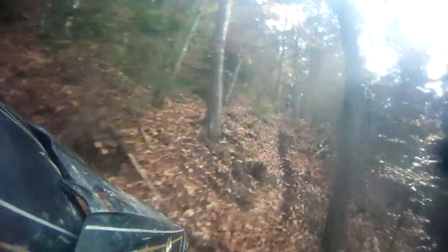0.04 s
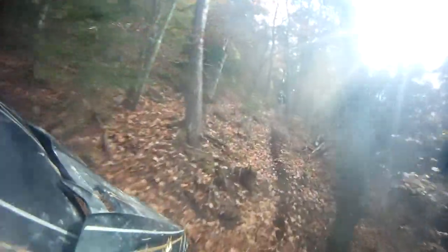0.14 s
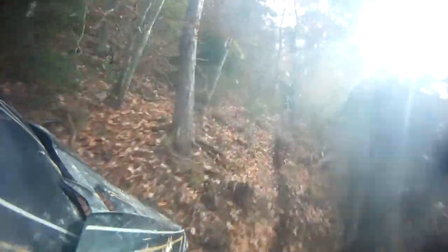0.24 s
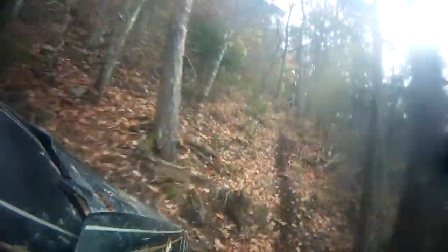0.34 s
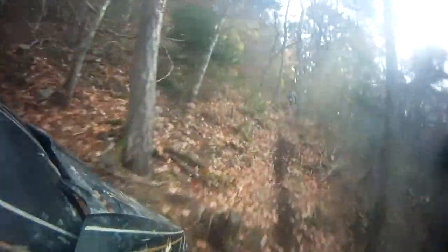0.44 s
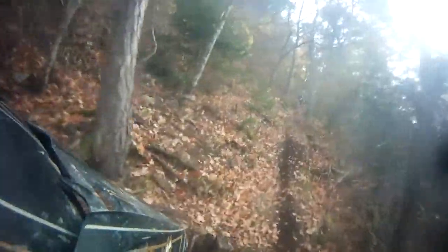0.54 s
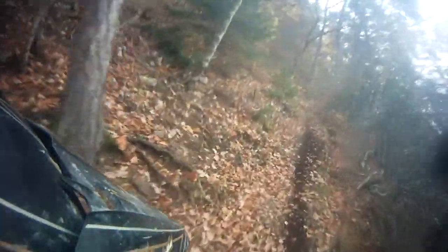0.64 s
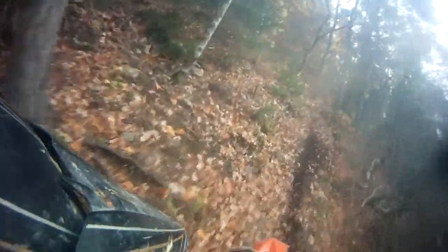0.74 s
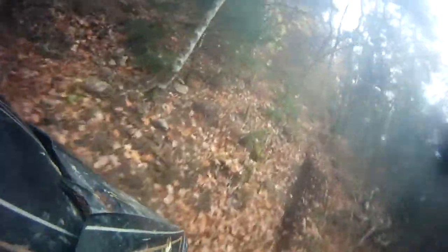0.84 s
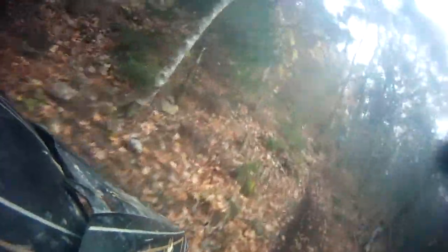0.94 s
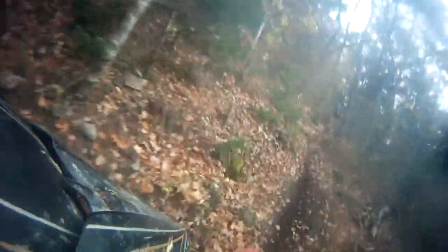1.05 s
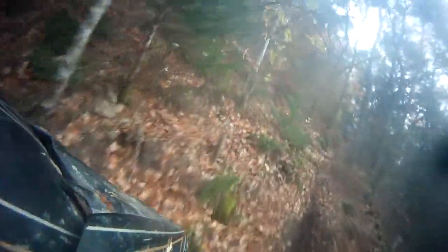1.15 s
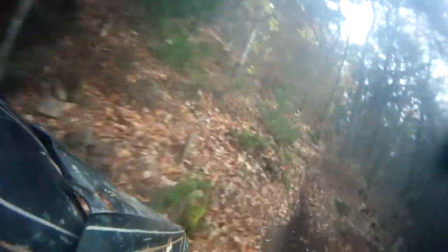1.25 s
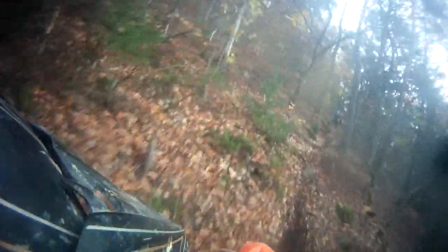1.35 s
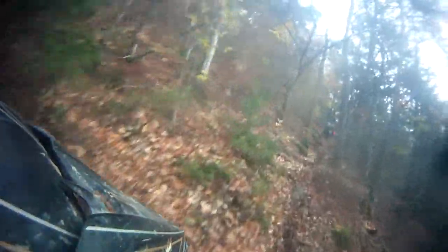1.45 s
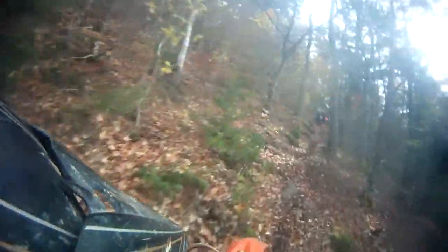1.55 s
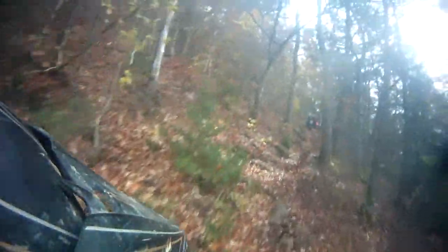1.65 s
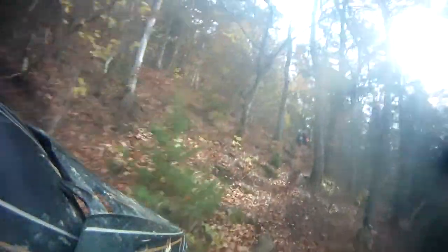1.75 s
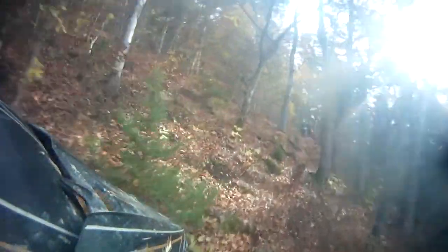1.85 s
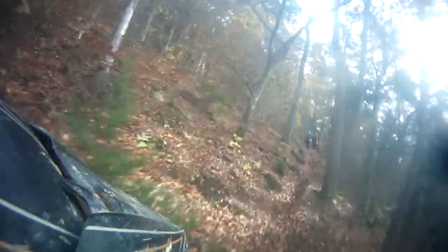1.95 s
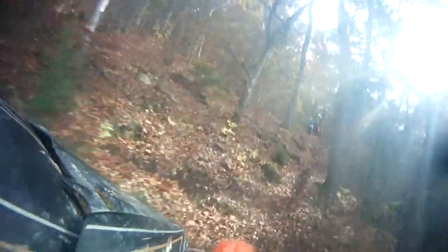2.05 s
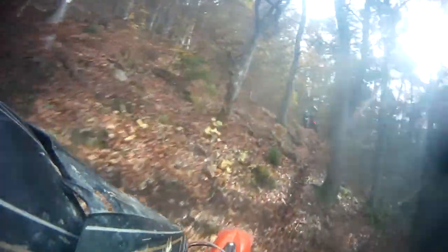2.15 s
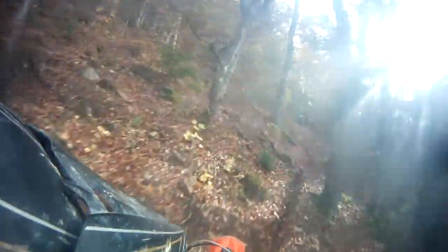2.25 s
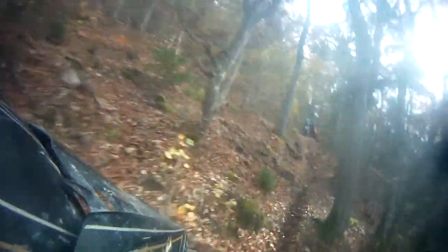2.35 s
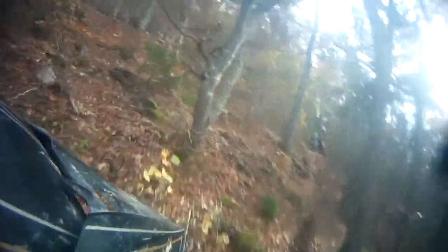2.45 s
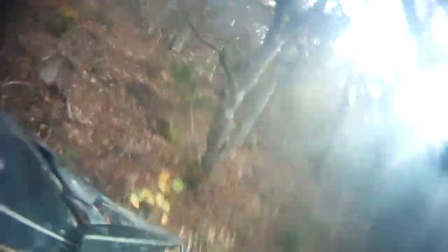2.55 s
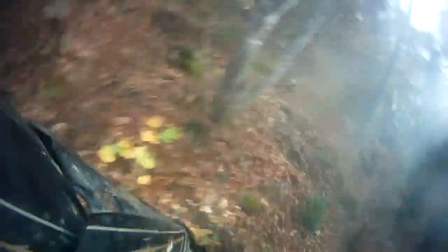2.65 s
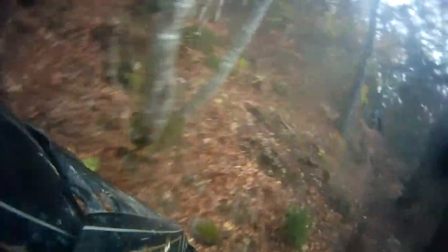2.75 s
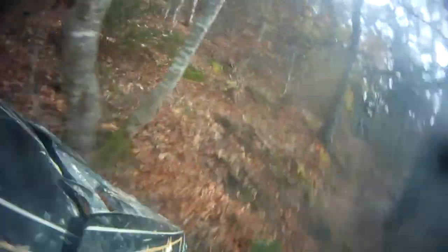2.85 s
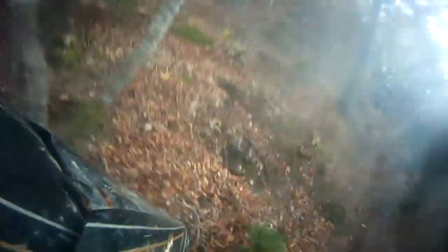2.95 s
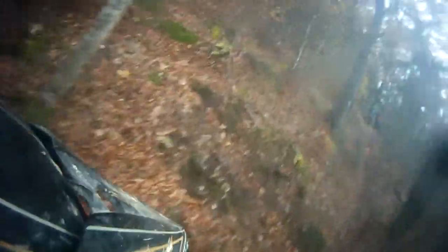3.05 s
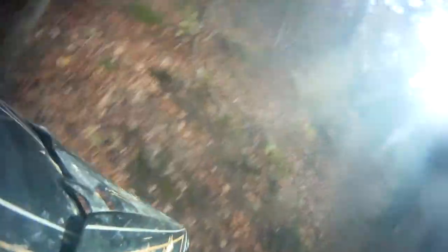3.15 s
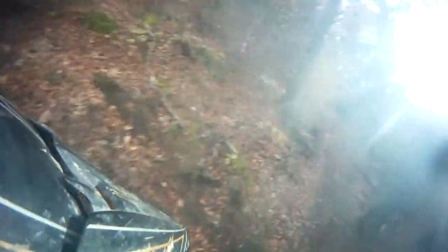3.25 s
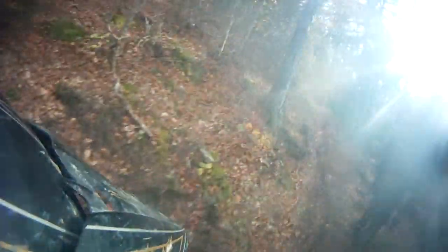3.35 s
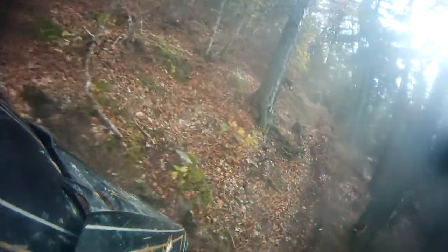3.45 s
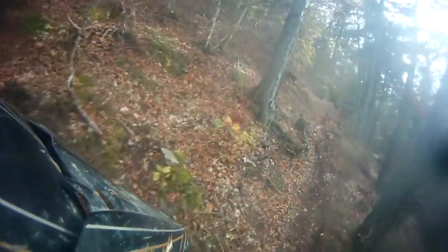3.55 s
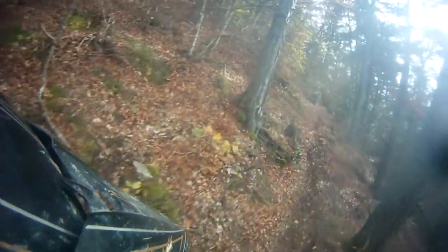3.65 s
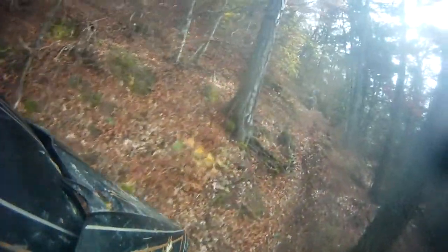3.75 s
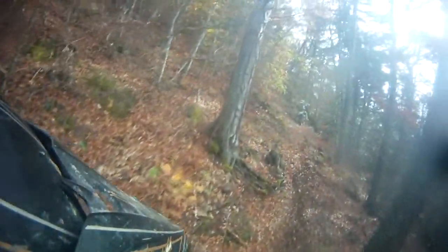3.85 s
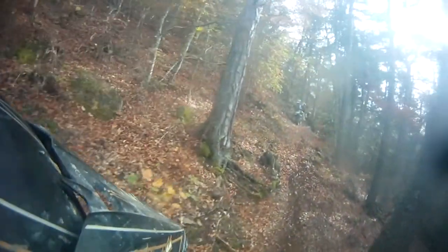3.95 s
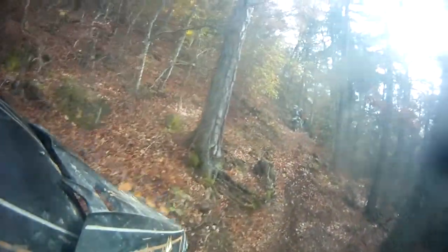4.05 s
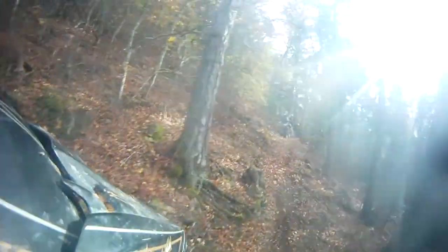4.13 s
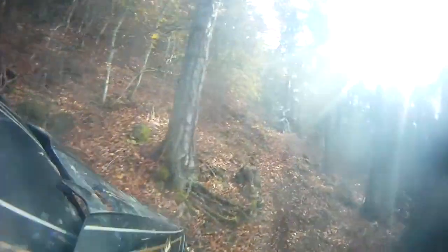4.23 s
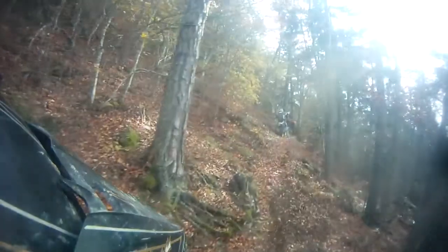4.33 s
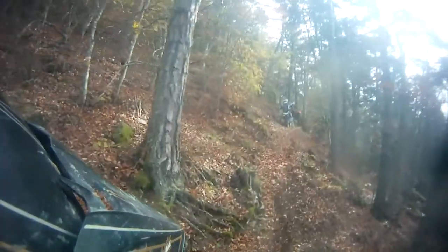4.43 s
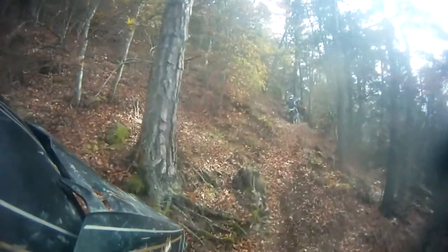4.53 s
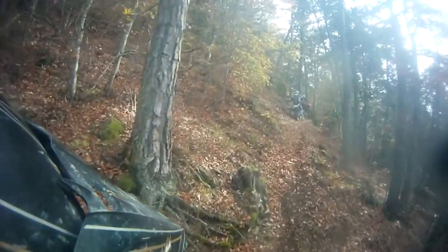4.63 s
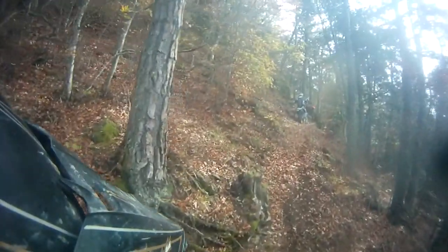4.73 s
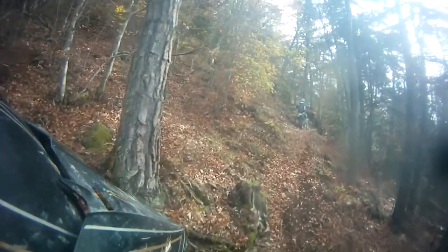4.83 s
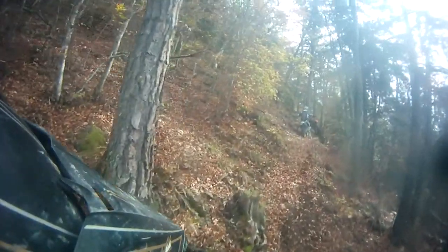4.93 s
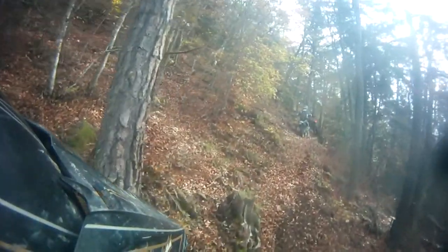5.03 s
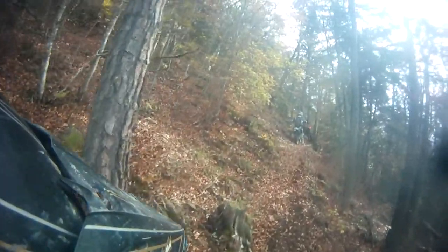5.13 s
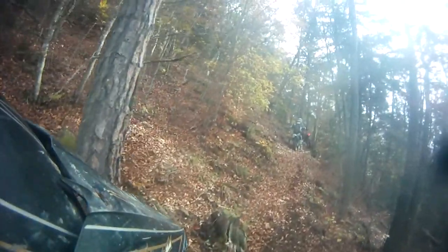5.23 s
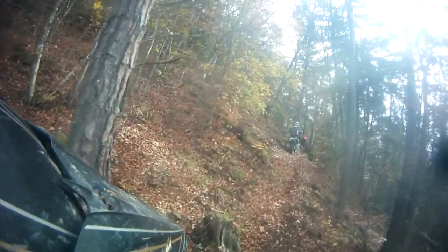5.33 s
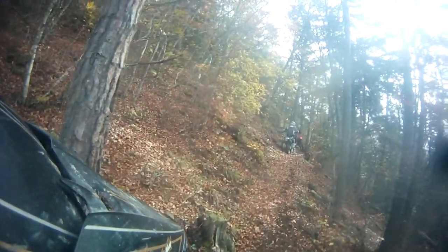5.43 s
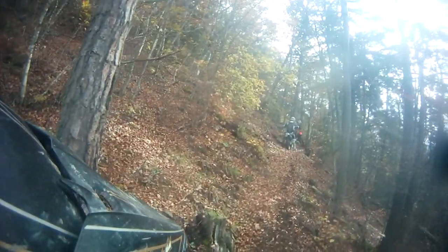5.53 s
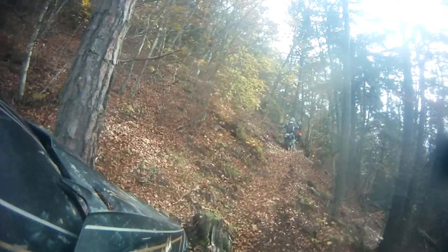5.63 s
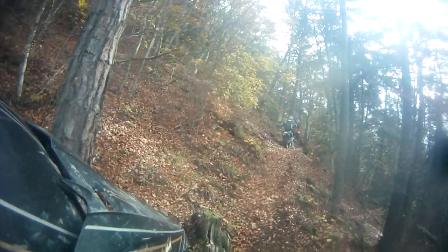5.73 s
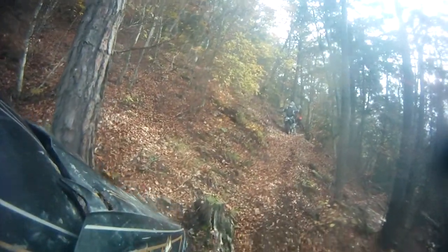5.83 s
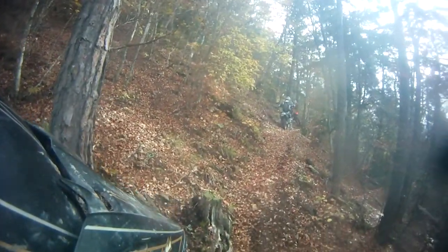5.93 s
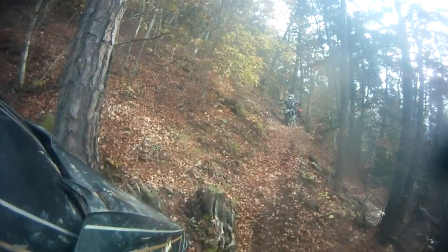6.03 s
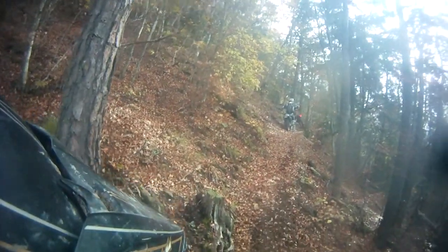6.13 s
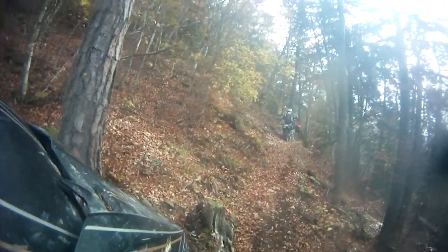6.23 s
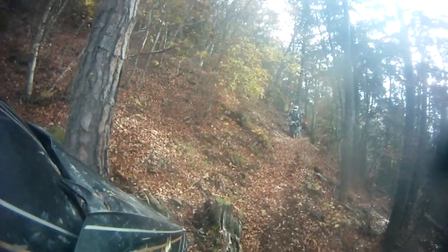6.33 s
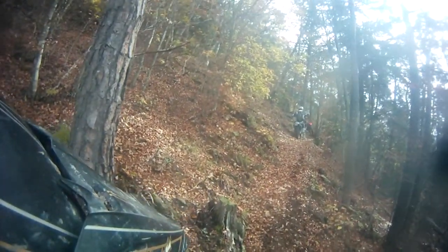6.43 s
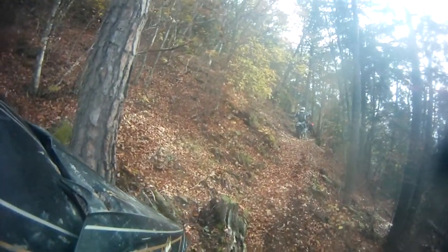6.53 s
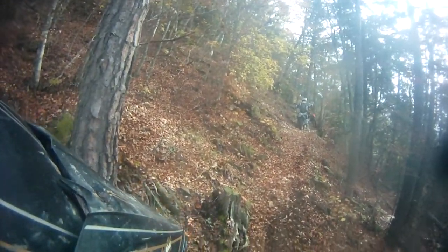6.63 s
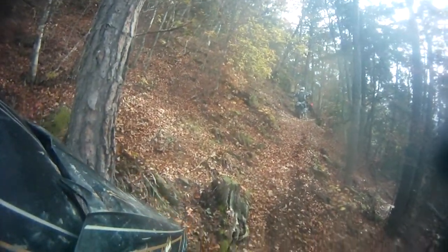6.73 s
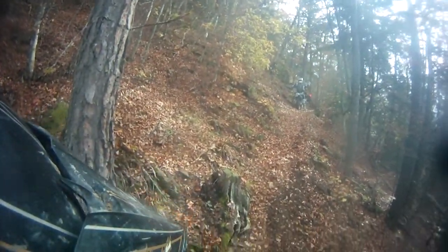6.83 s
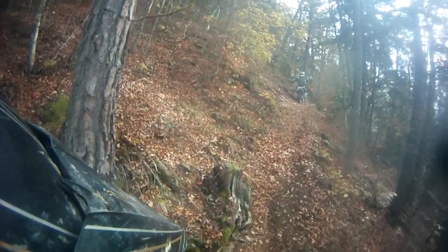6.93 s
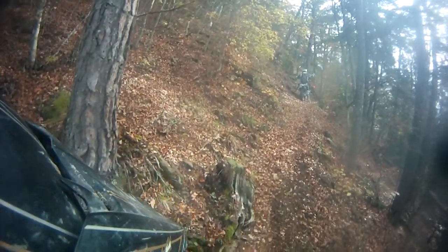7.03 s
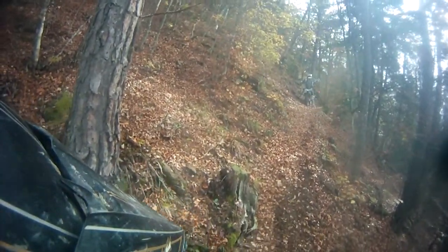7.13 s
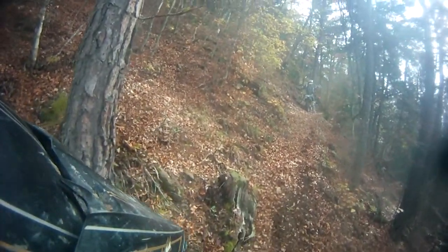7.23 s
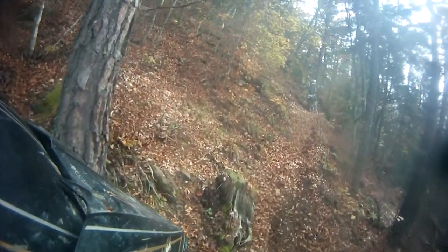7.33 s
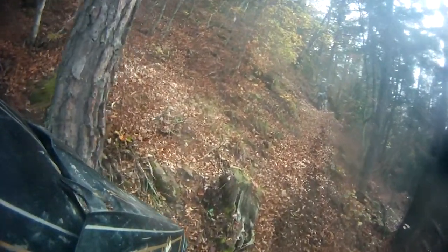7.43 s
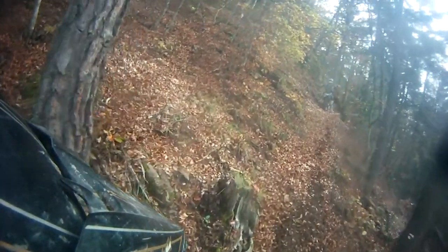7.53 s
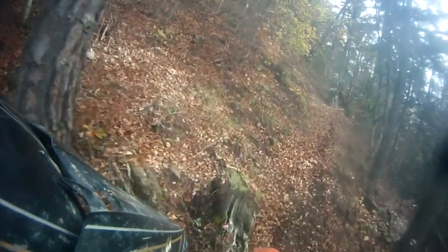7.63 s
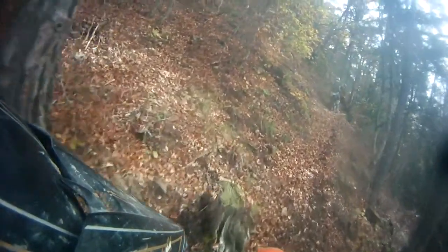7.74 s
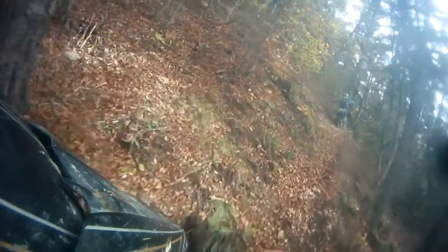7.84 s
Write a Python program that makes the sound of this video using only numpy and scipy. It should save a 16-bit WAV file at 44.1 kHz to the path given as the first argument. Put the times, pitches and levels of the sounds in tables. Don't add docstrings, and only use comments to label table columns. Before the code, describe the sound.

Close, boxy, nearly mono sound of an off-road motorcycle on a leafy trail: low thumping exhaust, dry metallic chatter and faint wind. A hard throttle blip leads into a long pull; then branches snap and knock on the camera housing with low thuds and leafy hiss. Short revs follow, then a slow idle of individual beats before a final rough acceleration.

```python
import sys
import numpy as np
from scipy import signal
from scipy.fft import rfft, irfft, next_fast_len
from scipy.io import wavfile
from scipy.ndimage import uniform_filter1d, map_coordinates

SR = 44100
rng = np.random.default_rng(int(sys.argv[2]) if len(sys.argv) > 2 else 0)


def generate_wav(sig):
    pcm = np.round(np.clip(np.atleast_2d(sig).T, -1, 1) * 32767).astype(np.int16)
    wavfile.write(sys.argv[1], SR, pcm)


def how_loud(loudness_db):
    steps = np.asarray(loudness_db, float) / 20
    return 10 ** steps


N = 347508
TIME = np.arange(N) / SR
CRUISE_HZ = 25
LEAD_S = .015
OPEN_S = 0.092


def noise(n=N):
    return rng.standard_normal(n)


def unit(x):
    return x / np.sqrt(np.mean(x ** 2) + 1e-20)


def summed(*levels_db):
    return 10 * np.log10(sum(how_loud(db) ** 2 for db in levels_db))


def along(points, hz):
    f, v = np.transpose(points)
    return np.interp(np.log(hz + 1), np.log(f + 1), v)


def filtered(x, response):
    m = next_fast_len(len(x) + SR // 8)
    return irfft(rfft(x, m) * response(np.fft.rfftfreq(m, 1 / SR)), m)[:len(x)]


def modes(table, f):
    return sum((-1) ** k * how_loud(db) * 1j * f * width / (hz * hz - f * f + 1j * f * width)
               for k, (hz, width, db) in enumerate(table))


def wobble(rate_hz):
    return map_coordinates(noise(int(N * rate_hz / SR) + 4), [TIME * rate_hz])


def train(times, sizes):
    at = np.round(times * SR).astype(int)
    inside = (at >= 0) & (at < N)
    return np.bincount(at[inside], sizes[inside], N)


def burst(rise_s, fall_s):
    return lambda f: SR * (rise_s / (1 - 2j * np.pi * f * rise_s) + fall_s / (1 + 2j * np.pi * f * fall_s))


def swells(table):
    return sum(how_loud(db) * np.exp(np.where(TIME < s, (TIME - s) / rise, (s - TIME) / fall))
               for s, db, rise, fall in table)


# time in seconds, firings per second.
SPEED = [(-.12, 27.52), (.29, 26.8), (.43, 19.5), (.58, 29.55), (1.28, 27.53), (1.8, 28.58), (1.93, 30.68),
         (2.25, 29.37), (2.39, 33.3), (2.82, 23.0), (3.71, 17.54), (3.84, 21.63), (4.59, 15.74),
         (5.13, 31.02), (6.03, 16.14), (6.73, 15.52), (7.12, 23.8), (7.93, 25.38)]


def fast(t):
    return np.interp(t, *np.transpose(SPEED)) - CRUISE_HZ


# time in seconds, firings lost.
STUMBLES = [
    (3.68, .312),
    (6.81, .35),
]
# time in seconds, lateness as a share of a cycle.
LATE = [(0, .05), (.6, .08), (.87, .2), (1.01, -.1), (1.15, .04), (1.5, -.07), (1.75, -.03), (1.93, .05),
        (2.06, .04), (2.2, .1), (2.36, .3), (2.5, 0), (3.4, -.04), (3.8, .03), (4.15, -.15), (4.33, .05),
        (4.6, -.05), (4.8, .07), (5.03, .08), (5.13, .06), (5.3, -.09), (5.42, -.13), (5.6, -.03),
        (5.8, .04), (6.2, 0), (6.55, .03), (6.85, 0), (7.0, .07), (7.35, .13), (7.5, .1), (7.63, 0),
        (7.8, .1)]


def firings():
    s = np.arange(SPEED[0][0], SPEED[-1][0], 1 / 1000)
    count = -3.457 + np.cumsum(np.interp(s, *np.transpose(SPEED))) / 1000
    count = count - sum(lost * (s > at) for at, lost in STUMBLES)
    count = count - np.interp(s, *np.transpose(LATE))
    return np.interp(np.arange(np.ceil(count[0]), count[-1]), np.maximum.accumulate(count), s)


# open in seconds, shut in seconds, exhaust bark in dB on opening,
# bark in dB before shutting, combustion knock in dB.
THROTTLE = [
    (-.1, 0.292, -59, -58.5, -11),
    (0.504, .8, -42, -59, -5),
    (0.792, 1.04, -53.5, -51, -14),
    (1.044, 2.386, -46, -48, 7.5),
    (3.332, 3.47, -48.5, -59.5, 6),
    (3.685, 4.295, -48, -56, 11),
    (4.28, 4.684, -70, -63, -16),
    (4.68, 4.97, -50.5, -58, 2),
    (6.845, 7.95, -49, -49, 7.5),
]


def throttle(t):
    shut_s = 0.059
    bark = how_loud(-64 + 0.48 * fast(t))
    knock_db = -10 + .3 * fast(t)
    for start, end, first_db, last_db, load_db in THROTTLE:
        share = np.clip((t - start) / OPEN_S, 0, 1) * np.exp(-np.maximum(t - end, 0) / shut_s)
        bark = bark + share * how_loud(np.interp(t, [start, end], [first_db, last_db]))
        knock_db = knock_db + share * (load_db - knock_db)
    return 20 * np.log10(bark), knock_db


def driven_db(t, bark_db, cruise_db, db_per_hz, least_db, load_db):
    return summed(cruise_db + db_per_hz * fast(t - 0.036), least_db, bark_db + load_db)


def shut_share(bark_db):
    return np.clip((-51.5 - bark_db) / 7.5, 0, 1)


def pulse_size(fire, luck):
    return np.sqrt(np.gradient(fire) * SR) * how_loud(.8 * luck[:, 0])


# time in seconds, frequency in Hz.
PIPE_HZ = [(0, 274), (.45, 275), (.55, 262), (.66, 289), (1.0, 284), (1.1, 260), (1.25, 264), (2.35, 280.3),
           (3.4, 261), (3.75, 260), (4.3, 261.6), (4.75, 260), (5.1, 274), (6.0, 247), (6.85, 245),
           (7.1, 260.5), (7.9, 278.4)]
# multiple of the first mode, level in dB, peak after the valve opens in seconds,
# half length in seconds, change in dB with the throttle shut.
PIPE = [(.47, -10.5, 0.005, 0.0075, 13.5), (0.635, -7.5, 0.0037, 0.0061, 3.5),
        (0.99, 3, 0.0095, 0.0082, -1.5), (1.141, -2, 0.0054, 0.0068, 5.5), (1.59, 0, 0.0051, 0.0054, 0.5),
        (1.86, -5.5, 0.0074, 0.0094, 0), (3.3, -3, 0.0068, 0.0064, -1), (4.01, -10, 0.008, 0.01, 8)]


def exhaust_bark(fire, bark_db, luck):
    t = np.arange(SR // 12) / SR
    shut = shut_share(bark_db)[:, None]
    pitch = np.interp(fire, *np.transpose(PIPE_HZ))[:, None]
    pitch = pitch * (1 + 0.75 * (0.14 + shut) * (t - LEAD_S))
    pitch = pitch * (1 + .006 * luck[:, 1:2])

    def hump(at, half):
        return np.exp(-((t - LEAD_S - at) / half) ** 2)

    rows = 0
    for multiple, db, at, half, shut_db in PIPE:
        scatter_db = .7 * luck[:, [int(multiple * 7) % 12]]
        tone = np.sin(2 * np.pi * multiple * pitch * (t - LEAD_S))
        rows = rows + how_loud(db + shut * shut_db + scatter_db) * hump(at, half) * tone
    cycle = np.gradient(fire)[:, None]
    puff_db = np.minimum(-5 + 0.74 * (1 / cycle - CRUISE_HZ), -3)
    rows = rows + how_loud(puff_db) * hump(0.78 * cycle, 0.0044) * np.sin(2 * np.pi * pitch * t)
    level = pulse_size(fire, luck) * how_loud(bark_db + 4.0)
    rows = -rows * (level / np.linalg.norm(rows, axis=1))[:, None]
    at = np.round((fire[:, None] + t - LEAD_S) * SR + SR).astype(int)
    bark = np.bincount(at.ravel(), rows.ravel(), N + 3 * SR)[SR:SR + N]
    return filtered(bark, lambda f: f ** 4 / (f ** 4 + 70 ** 4))


# frequency in Hz, width in Hz, level in dB.
SILENCER = [(50, 40, -34), (148, 25, 13.5), (191.4, 40, 17)]


def silencer_boom(fire, bark_db, luck):
    boom_db = driven_db(fire, bark_db, -68, 2.2, -65.5, -16)
    box = lambda f: modes(SILENCER, f) / (1 + 1j * f / 260) ** 2
    pulses = train(fire - .003, pulse_size(fire, luck) * how_loud(boom_db - 1.5))
    return filtered(pulses, box) / np.linalg.norm(filtered(np.eye(1, N)[0], box))


# start in seconds, end in seconds, gain in dB.
OVERRUNS = [
    (5.15, 5.44, 11.5),
    (2.4, 3, 12),
    (.66, 1.05, 8),
    (.05, .3, 4),
]
SHAKE_DB = [-24, -19, -16, -5, -14, -16, -18, -14]


def frame_shake(fire, bark_db):
    turns = np.interp(TIME, fire, np.arange(len(fire)))
    free_db = 3 * shut_share(bark_db)
    level_db = -70.5 + 1.0 * (1 / np.gradient(fire) - CRUISE_HZ) + free_db
    level_db = np.interp(TIME, fire, level_db)
    for start, end, db in OVERRUNS:
        level_db = level_db + db * np.clip(np.minimum(TIME - start, end - TIME) / OPEN_S + .5, 0, 1)
    return sum(how_loud(db + level_db) * np.sin(2 * np.pi * k * turns) for k, db in enumerate(SHAKE_DB, 1))


def exhaust_jet(fire, bark_db, luck):
    gate = filtered(train(fire + .002, how_loud(bark_db + 1.5 * luck[:, 2])), burst(.001, .009))
    jet_modes = [(797, 57, 1.0), (1500, 360, -2.5), (11500, 1300, -34)]  # Hz, width Hz, dB
    colour = lambda f: modes(jet_modes, f) * f ** 4 / (f ** 4 + 720 ** 4)
    return how_loud(6.5) * gate * unit(filtered(noise(), colour))


# share of a cycle, level in dB against the knock,
# length in seconds.
VALVES = [
    (-.23, -8, .003),
    (-.5, -22, .001),
    (-.1, -16, .001),
    (.27, -7.5, .004),
]


def metal_drive(fire, knock_db, luck):
    knock_db = np.minimum(knock_db, 15)
    knocks = train(fire + .0026 + .0004 * luck[:, 3], how_loud(knock_db + 4 + .8 * luck[:, 4]))
    swell = filtered(knocks, burst(.0004, .0026))
    swell = swell + filtered(train(fire + .002, how_loud(knock_db - 9)), burst(.005, .007))
    for k, (share, db, length) in enumerate(VALVES):
        seat = fire + (share + 0.09 + 0.017 * luck[:, 5 + k]) * np.gradient(fire)
        seat_db = 10.0 + db + .05 * knock_db + 1.6 * luck[:, -1 - k % 3]
        swell = swell + filtered(train(seat, how_loud(seat_db)), burst(0.0016, length))
    loose = how_loud(1.3 * wobble(350) + .5 * wobble(45))
    drive = (1 + .7 * np.abs(swell)) * loose
    return drive / np.sqrt(np.abs(uniform_filter1d(drive ** 2, size=SR // 8)))


# frequency in Hz, width in Hz, level in dB (not used).
METAL = [(884, 17, -6), (1506, 79, -6), (2747, 216, -2), (3160, 283, -1), (3772, 24, -2), (4085, 86, 0),
         (4960, 223, -4), (6556, 147, -12), (7920, 570, -18), (10070, 125, -30)]
# frequency in Hz, density in dB per Hz.
RATTLE = [(280, -82), (480, -9.5), (787, -10), (910, -7.5), (1510, -8), (1780, -6.5), (2550, -0.5),
          (3000, -15.5), (3220, -6), (4130, -2), (5520, -11.5), (6670, -12.5), (7380, -23.5),
          (15500, -40.5)]


def metal(x):
    equal = [(hz, width, 0) for hz, width, _ in METAL]
    return filtered(x, lambda f: how_loud(along(RATTLE, f)) * (.5 + 0.82 * np.abs(modes(equal, f))))


def patchy(x, patchy_db):
    z = signal.stft(x, nperseg=512)[2]
    field = uniform_filter1d(rng.standard_normal(z.shape), size=5, axis=0)
    field = uniform_filter1d(field, size=20, axis=1)
    return signal.istft(z * how_loud(patchy_db * unit(field)), nperseg=512)[1][:N]


def metal_rattle(drive, bark_db):
    low = lambda f: 1 / (1 + (f / 5500) ** 12)
    heavy = filtered(drive * noise(), lambda f: np.sqrt(low(f) * (1 - low(2.94 * f))))
    heavy = heavy + filtered(unit(drive ** 1.2) * noise(), lambda f: np.sqrt(low(3.4 * f)))
    jingle = unit(drive ** 0.49 * how_loud(1.5 * wobble(120)))
    light = filtered(jingle * noise(), lambda f: np.sqrt(1 - low(f)))
    level_db = driven_db(TIME, bark_db, -41, 1.17, -43, 15)
    return how_loud(level_db) * unit(patchy(metal(heavy + light), patchy_db=1.16))


def engine_cover(drive, bark_db, knock_db):
    level_db = driven_db(TIME, bark_db, -49.5, 1.92, -55.5, 6)
    ring = filtered(drive * noise(), lambda f: modes([(3265, 235, 3), (4270, 200, -2)], f) ** 2)
    return how_loud(level_db - 0.28 * knock_db + 2.2 * wobble(6)) * unit(ring)


def cooling_fins(knock_db):
    level = how_loud(-65.5 + 1.2 * fast(TIME) + 0.8 * knock_db + 1.5 * wobble(14))
    return level * unit(filtered(noise(), lambda f: modes([(8000, 230, 0)], f) ** 2))


def engine():
    fire = firings()
    luck = rng.standard_normal((len(fire), 12))
    fire_bark_db, fire_knock_db = throttle(fire)
    bark_db, knock_db = throttle(TIME)
    drive = metal_drive(fire, fire_knock_db, luck)
    exhaust = exhaust_bark(fire, fire_bark_db, luck) + silencer_boom(fire, fire_bark_db, luck)
    exhaust = exhaust + exhaust_jet(fire, fire_bark_db, luck)
    parts = metal_rattle(drive, bark_db) + engine_cover(drive, bark_db, knock_db) + cooling_fins(knock_db)
    return exhaust + frame_shake(fire, fire_bark_db) + parts


# frequency in Hz, density in dB per Hz.
FLOOR = [(25, -24), (45, -13), (90, -19), (150, -19), (400, -19), (700, -15), (5000, -37), (15000, -37)]


def floor():
    wind = unit(filtered(noise(), lambda f: how_loud(along(FLOOR, f))))
    wind_db = -63 + .5 * fast(TIME) + 1.2 * wobble(2.8)
    whine = np.sin(2 * np.pi * 11100 * TIME + .8 * wobble(30))
    return how_loud(wind_db) * wind + how_loud(-75.5) * whine


# frequency in Hz, level in dB, t60 in seconds.
HOUSING = [(59.4, -15.5, 0.15), (154, -15.5, 0.11), (303, -4.5, 0.077), (505, -0.5, 0.057),
           (855, -6, 0.036), (1390, -11.5, 0.023)]
# frequency in Hz, density in dB per Hz.
CRACK = [(180, -15.5), (300, -8.5), (1100, -6), (1450, 1.5), (1740, -10.5), (2540, -3), (3980, -8.5),
         (5100, -6), (5730, -9.5), (10100, -29.5), (15700, -69)]
# start in seconds, ring in dB, crack in dB, brightness in dB per octave.
TAPS = [(.005, -18, -23.5, -6.5), (.845, -23, -24, -2), (.95, -30, -55, 2), (1.067, -21.5, -32, -9),
        (2.585, -20.5, -15, -25), (2.588, -16.5, 4.5, 4), (3.172, -35, -36, -14), (2.598, -37, -20, -1),
        (2.569, -26, -30, -20), (2.635, -26, -20, -2.5), (2.643, -30, -12, -5.5), (2.6429, -34, -15, -14),
        (2.652, -35, 1.5, 3.5), (2.659, -17, -15, -1), (2.674, -16.5, -21, -6.5), (2.69, -11, -5.5, -6),
        (2.695, -28, -16, -14), (2.768, -29, -29.5, -5), (2.855, -26.5, -26, -30), (2.95, -23.5, -58, -23),
        (2.987, -42, -33, -11), (3.026, -40, -33, -12), (3.091, -24.5, -29.5, -8), (3.12, -35, -32, 9),
        (3.133, -16.5, -18, -10), (3.141, -29, -19.5, -5), (3.184, -18.5, -24, -12), (3.221, -34, -38, -17),
        (3.32, -19.5, -25, -1), (6.099, -72, -39, -1)]


def taps():
    out, t = np.zeros(N + SR), np.arange(SR // 5) / SR
    snap_s, scrape_s, hard_db = 0.0021, 0.0056, -10
    for s, ring_db, crack_db, tilt_db in TAPS:
        length = snap_s + scrape_s / (1 + how_loud(crack_db - hard_db) ** 2)
        weight_db = 0.42 * (ring_db + 4.0) - 0.2 * (tilt_db + 18)
        ring = 0
        for hz, db, t60 in HOUSING:
            mode_db = db + rng.normal(0, 1.5) + weight_db * (hz < 400)
            ring = ring + how_loud(mode_db - 60 * t / t60) * np.sin(2 * np.pi * hz * t)
        colour = lambda f: how_loud(along(CRACK, f) + tilt_db * np.log2(f / 1000 + 0.41)) * (f < 15300)
        fade = np.exp(-t / length) * (1 - np.exp(-t / 0.00029))
        crack = unit(filtered(noise(len(t)) * fade, colour)) * np.sqrt(np.mean(fade ** 2))
        crack = crack * (1 - np.exp(-t / 0.00026))
        ring = ring * (1 - np.exp(-t / 0.0034))
        out[round(s * SR):][:len(t)] += how_loud(ring_db) * ring + how_loud(crack_db - 3.5) * crack
    return filtered(out[:N], lambda f: (1j * f / (45 + 1j * f)) ** 2)


# peak in seconds, level in dB, rise in seconds,
# fall in seconds.
CLANKS = [(.564, -11.5, 0.00063, 0.002), (.6, -24, 0.0017, .0025), (1.1175, -19, .0006, .002),
          (1.3965, -22, 0.00065, 0.0027), (1.44, -27, .001, 0.0018), (1.5477, -21.5, .0006, .002),
          (1.69, -18, .0006, .002), (1.831, -19, .0006, .002), (1.8645, -21, 0.0005, 0.0022),
          (2.1235, -45, .0006, .002), (2.3035, -19.5, .0006, .002), (7.0525, -18.5, .0006, 0.0027),
          (3.706, -29, 0.00086, 0.016), (3.775, -19, 0.00074, 0.0039), (1.796, -17, .001, 0.0016),
          (6.958, -21, .001, 0.0034), (7.008, -17.5, 0.0005, 0.0047), (7.183, -22.5, 0.00086, 0.0024),
          (4.22, -46, .004, .005), (4.9, -40, .004, 0.0069), (6.906, -29, .001, 0.0036),
          (6.448, -40, .002, 0.0029), (6.478, -23, 0.005, 0.0052), (6.527, -28.5, 0.0037, 0.0063)]


def clanks():
    impact = filtered(noise(), lambda f: f ** 2 / (f ** 2 + 1300 ** 2) / (1 + (f / 8500) ** 2))
    return swells(CLANKS) * unit(metal(impact))


# start in seconds, level in dB, frequency in Hz,
# t60 in seconds.
FLEXES = [(.96, -44, 60, .11), (1.066, -29, 505, .07), (2.622, -21, 70, .085), (2.636, -22, 210, .051),
          (2.657, -16.5, 155, .1), (2.692, -23, 1500, .045), (2.696, -22.5, 505, .059),
          (2.768, -36, 980, .035), (2.856, -28, 430, .04), (2.856, -41, 130, .05), (2.899, -41, 510, .049),
          (2.942, -38, 160, .057), (2.997, -39, 190, .035), (3.03, -31, 490, .045), (3.172, -31, 240, .035),
          (3.185, -20, 1480, .032), (3.325, -33, 290, .07), (6.101, -33, 1130, .03)]


def helmet_flexes():
    out, t = np.zeros(N + SR), np.arange(SR // 5) / SR
    for s, db, hz, t60 in FLEXES:
        thud = how_loud(db - 60 * t / t60) * np.sin(2 * np.pi * hz * t)
        out[round(s * SR):][:len(t)] += thud * (1 - np.exp(-t * hz / 0.16))
    return out[:N]


# start in seconds, level in dB, centre in Hz, length in seconds.
TICKS = [(2.596, -12, 6000, 0.00065), (2.6, -6, 3500, 0.00079), (2.607, -26, 9000, 0.00075),
         (2.63, -38, 9000, .001), (2.648, -21, 4200, .003), (2.6635, -24, 7500, .001),
         (2.654, -8.5, 6400, 0.00075), (2.679, -31, 6500, 0.0012), (2.691, -27, 6500, 0.00066),
         (2.698, -32, 8000, 0.00072), (2.588, 0.5, 10900, 0.00061), (2.6045, -28, 11000, .001),
         (2.6545, -16, 8950, 0.00032), (3.187, -45, 6500, 0.0008)]


def splinters():
    out, t = np.zeros(N + SR), np.arange(SR // 5) / SR
    for s, db, hz, length in TICKS:
        tick = unit(filtered(noise(len(t)), lambda f: modes([(hz, .7 * hz, 0)], f)))
        out[round(s * SR):][:len(t)] += how_loud(db) * tick * np.exp(-t / length) * (1 - np.exp(-t / 0.00019))
    return out[:N]


# peak in seconds, level in dB, rise in seconds, fall in seconds.
BRUSH = [
    (3.065, -48, .015, .012),
    (3.135, -47, .012, .015),
    (2.615, -43, .005, .008),
]


def leaves():
    hiss = unit(filtered(noise(), lambda f: modes([(8000, 1600, 8), (11500, 2000, -7)], f)))
    return swells(BRUSH) * how_loud(2.3 * wobble(300)) * hiss


def scene():
    mono = engine() + floor() + taps() + clanks() + helmet_flexes() + splinters() + leaves()
    trace = how_loud(-23) * filtered(mono, lambda f: f ** 2 / (f ** 2 + 9000 ** 2)) * wobble(900)
    return np.array([mono + trace, mono - trace])


def roll_off(x):
    return signal.sosfilt(signal.butter(12, 15880, fs=SR, output="sos"), x)


# start in seconds, end in seconds, gain in dB.
DUCK = (2.627, 2.6305, -16)


def record(dry):
    start, end, db = DUCK
    gain = uniform_filter1d(np.where((TIME > start) & (TIME < end), how_loud(db), 1.), size=20)
    x = dry * gain
    x = x / (1 + np.abs(x) ** 8) ** (1 / 8)
    x = np.array([filtered(c, lambda f: (f < 15800) / (1 + (f / 15300) ** 40)) for c in x])
    return roll_off(x)


dry = scene()
out = record(dry)
generate_wav(out)
```